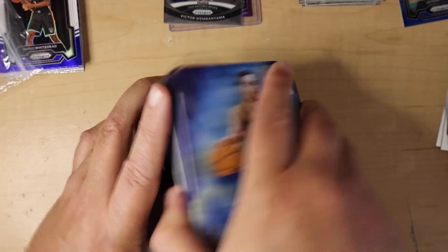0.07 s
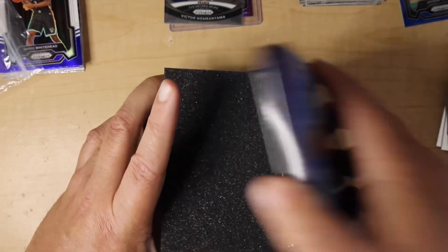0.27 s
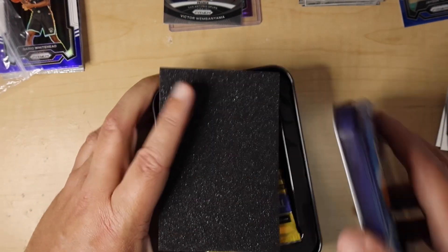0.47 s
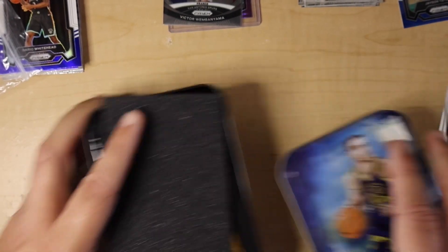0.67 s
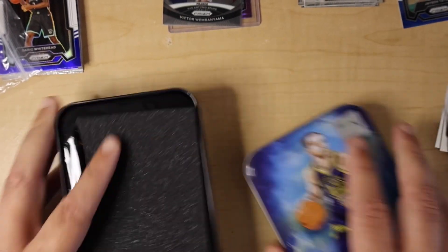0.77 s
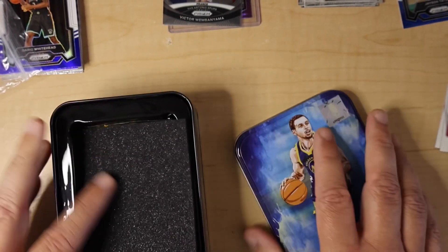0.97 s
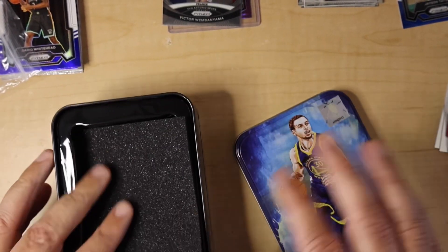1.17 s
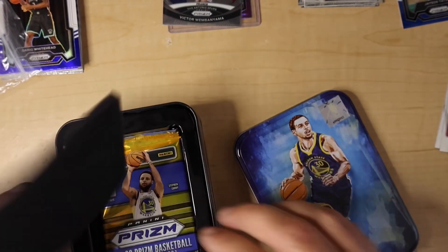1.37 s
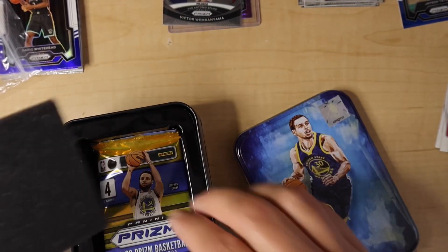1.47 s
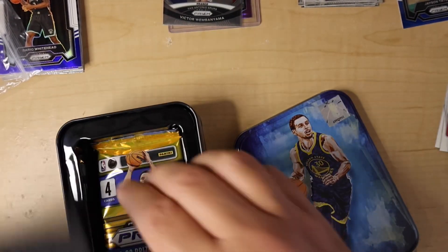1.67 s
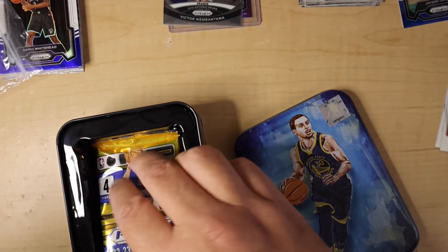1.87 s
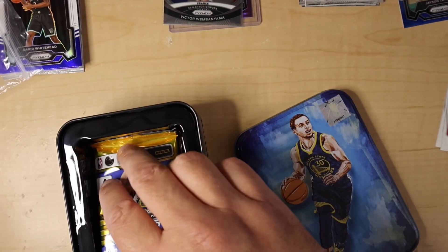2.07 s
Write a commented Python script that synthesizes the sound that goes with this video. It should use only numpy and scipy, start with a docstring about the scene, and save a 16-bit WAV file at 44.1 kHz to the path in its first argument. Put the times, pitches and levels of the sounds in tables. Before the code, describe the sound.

A thin metal tin lid creaks and pops free, brushes away, the tin scrapes along a wooden table, the lid clacks down, then foam rubs and a foil packet crackles; close microphone, small room.

```python
"""In a small room with a wooden table, a thin metal lid is pried off a tin: it creaks, scrapes and pops free.
The tin slides over the table, the lid lands with a clack, a foam pad is rubbed out and a foil packet crackles.
Blows are fading tones plus short noise bursts; rubbing and rustling are shaped noise; sliding is ringing noise.
A room echo, faint room air and a hum are added. The loudest peaks clip, and a limiter dips the level after them."""
import sys
import numpy as np
from scipy import signal
from scipy.fft import rfft, irfft
from scipy.io import wavfile
from scipy.ndimage import uniform_filter1d, minimum_filter1d

SR = 44100
rng = np.random.default_rng(int(sys.argv[2]) if len(sys.argv) > 2 else 0)


def wrap_up_sound(samples):
    """Save the sound to the file named by the first command line argument, as 16-bit audio."""
    columns = np.atleast_2d(samples).T
    # keep every value between -1 and 1, then stretch to whole-number steps
    tamed = np.clip(columns, -1, 1)
    steps = np.round(tamed * 32767).astype(np.int16)
    wavfile.write(sys.argv[1], SR, steps)


N = 93536
TIME = np.arange(N) / SR  # seconds

# All decibel columns are relative: the functions add further gains.
# t60_s is the time to fade by 60 dB; ring_db is the ring's level relative to its blow.

# Tone of the room air: pitch_hz [Hz], level_db [dB]
AIR_TONE = [(25, -22), (100, 4.5), (250, 3.5), (550, 6), (1200, -8), (3000, -6), (8000, -15.5),
            (16000, -16)]
# Room echo by band: pitch_hz [Hz], level_db [dB], t60_s [s]
ECHO_BANDS = [(60.3, -16, 0.16), (242, -2.5, 0.33), (634, -4, 0.43), (1300, -2.5, 0.42), (2580, -0.5, 0.45),
              (5140, 1, 0.43), (9400, 4, 0.31), (16200, -12.5, 0.38)]
# First reflections from walls and ceiling: delay_s [s], level_db [dB]
WALL_REFLECTIONS = [(.0125, -20.5), (.0235, -18), (0.0296, -15.5), (0.0328, -30.5), (.039, -26),
                    (.053, -30.5)]
# Tone of those reflections: pitch_hz [Hz], level_db [dB]
WALL_TONE = [(60, -24), (500, -1.5), (1500, -1), (5000, 2.5), (10000, -8), (16000, 10)]
# Left-right likeness of the close sounds: pitch_hz [Hz], likeness [-1 to 1]
NEAR_LIKENESS = [(50, 1), (1000, 0.99), (3000, 0.93), (7000, 0.27), (13000, 0.1)]
# Left-right likeness of the echo and room air: pitch_hz [Hz], likeness [-1 to 1]
FAR_LIKENESS = [(50, 0.11), (600, 0.88), (1500, 0.97), (3200, 0.17), (7000, -0.01), (12000, -0.55)]

# Soft knocks of fingers and pad on the tin: start_s [s], level_db [dB], ring_db [dB]
KNOCKS = [(.433, -41, 4.5), (.7595, -28, 4), (.836, -25, -18), (.859, -27, -8), (1.3515, -22.5, -3.5),
          (1.361, -32.5, 7), (1.799, -35, -9), (1.8415, -34.5, -3), (1.846, -30, -3)]
# Clatter of a knock by band: pitch_hz [Hz], level_db [dB], t60_s [s]
KNOCK_CLATTER = [(40, -11, .08), (198, -2.5, 0.085), (516, 0.5, .07), (930, 7, 0.18), (2100, 7, 0.024),
                 (4000, -17.5, 0.064), (16000, -11, 0.034)]

# Pad dragging along the tin wall: time_s [s], level_db [dB]
DRAG_LEVEL = [(1, -73), (1.18, -42), (1.23, -44.5), (1.275, -36), (1.33, -41), (1.42, -45), (1.55, -54),
              (1.7, -56.5), (1.81, -47), (1.89, -51.5), (2, -36), (2.06, -46), (2.1, -45)]
# Tone of the drag: pitch_hz [Hz], level_db [dB]
DRAG_TONE = [(40, -21), (200, -9.5), (520, 8.5), (1100, 5.5), (2200, 4.5), (4000, -27), (16000, -20)]
# Hiss of the foam and rustle of the foil: time_s [s], level_db [dB]
RUSTLE_LEVEL = [(1.05, -85), (1.14, -55), (1.22, -43.5), (1.32, -46), (1.365, -40), (1.41, -56),
                (1.48, -48), (1.56, -43.5), (1.65, -47), (1.71, -59), (1.77, -43.5), (1.81, -50.5),
                (1.85, -42), (1.9, -47), (1.96, -36), (2.03, -36), (2.065, -52), (2.082, -33.5),
                (2.12, -39.5)]
# Tone of the hiss and rustle: pitch_hz [Hz], level_db [dB]
RUSTLE_TONE = [(100, -15), (900, -27), (2000, 1), (4000, -6), (6200, -1), (9000, -5.5), (16000, -5.5)]
# Bursts of two foil snaps, the first followed by weaker reflections off the room:
# start_s [s], level_db [dB], tilt_db [dB per octave above 2 kHz], bass_db [dB below 500 Hz]
FOIL_BURSTS = [(1.9321, -5.5, 1.5, -5), (1.9447, -26, -1, -4), (1.948, -21.5, -10, 0), (1.958, -21.5, 0, 1),
               (2.0208, -4, 4.5, 7), (2.035, -20, 9, 0)]
# Such a burst by band: pitch_hz [Hz], level_db [dB], t60_s [s]
FOIL_BANDS = [(40, -23, 0.066), (304, -20.5, 0.016), (915, -11.5, 0.052), (2200, 3.5, 0.018),
              (4650, -1.5, .011), (8800, -2.5, 0.012), (16000, -8.5, 0.0089)]

# Tin sliding on the table: time_s [s], level_db [dB], pitch_factor [times]
SLIDE_PATH = [(.36, -58, 0.97), (.52, -50, 1.36), (.56, -36.5, 0.92), (.62, -25.5, 1.096),
              (.7, -24.5, 1.09), (.765, -24.5, 0.95), (.81, -31, 0.84), (.86, -34.5, 0.69),
              (.895, -35, 1.4), (.93, -92, 0.44)]
# Resonances of the sliding tin, before the pitch factor: pitch_hz [Hz], width_hz [Hz], level_db [dB]
SLIDE_MODES = [(872, 106, -1.5), (1119, 43, 0.5), (1545, 110, -7.5), (1866, 32, -11), (2476, 30, -16),
               (3320, 33, -19), (5550, 83, -23), (6020, 47, -23.5)]
# Tone of the sliding grit: pitch_hz [Hz], level_db [dB]
SLIDE_TONE = [(40, -43), (300, -17), (700, -1), (1100, 1.5), (2000, -7), (3500, -16), (7000, -20),
              (11000, -21), (16000, -24.5)]

# Lid landing on the table: start_s [s], level_db [dB], ring_db [dB]
CLACKS = [(.924, 9.5, -1.5), (.9325, -4.5, -18)]
# Ringing tones of the loose lid: pitch_hz [Hz], level_db [dB], t60_s [s]
LID_MODES = [(797, -25, .2), (975, -7, .05), (1065, -6, .085), (1653, -17, .15), (1919, -20, .17),
             (2054, -15, .12), (2293, -19, .12), (2444, -18, .15), (3122, -20, .1), (3441, -16, .13),
             (4078, -21, .1), (4765, -21, .1), (7880, -23, .07), (14850, -23, .08)]
# Clatter of the lid by band: pitch_hz [Hz], level_db [dB], t60_s [s]
LID_CLATTER = [(30, -31, 0.053), (120, -10, 0.011), (412, -4, 0.02), (940, 1.5, 0.043), (2020, 6.5, 0.012),
               (3800, -12, 0.11), (7300, -16.5, 0.12), (11900, -25.5, 0.11), (17300, -18, 0.016)]
# Lid scuffing the table as it settles: time_s [s], level_db [dB]
SETTLE_LEVEL = [(.925, -74), (.935, -13), (.948, -12), (.958, -5.5), (.978, -11.5), (.995, -29),
                (1.04, -39), (1.09, -34), (1.16, -46.5), (1.24, -73)]
# Tone of the scuffing: pitch_hz [Hz], level_db [dB]
SETTLE_TONE = [(60, -28), (350, -12), (1000, 5.5), (2300, 1), (3600, -4.5), (6500, -9), (9000, -27),
               (16000, -46)]

# Fingers straining on the rim: time_s [s], level_db [dB]
GRIP_LEVEL = [(0, -33), (.015, -37.5), (.03, -33), (.039, -27.5), (.055, -36.5), (.075, -32.5),
              (.087, -32.5), (.1, -18), (.112, -31), (.14, -76)]
# Tone of the straining fingers: pitch_hz [Hz], level_db [dB]
GRIP_TONE = [(30, -29), (100, -0.5), (200, 1.5), (320, 7.5), (480, 1), (1000, -52), (4000, -80),
             (16000, -68)]
# Rim scraping: time_s [s], level_db [dB]
RIM_LEVEL = [(0, -57), (.033, -50), (.039, -34.5), (.044, -39), (.052, -30.5), (.058, -47), (.08, -46.5),
             (.087, -21), (.103, -24.5), (.11, -74)]
# Tone of the scrape: pitch_hz [Hz], level_db [dB]
RIM_TONE = [(100, -38), (600, 6.5), (1700, 0.5), (3000, -4.5), (5000, -7.5), (8000, -13), (16000, -13)]
# Rim slipping and popping free: start_s [s], level_db [dB], ring_db [dB]
POPS = [(.0865, -31, -25), (.0915, -31, 4.5), (.096, -27, 3), (.1005, -16, -23), (.1046, 2, -0.5),
        (.1095, -2.5, -17.5)]
# Ringing tones of the tin as it opens: pitch_hz [Hz], level_db [dB], t60_s [s]
TIN_MODES = [(103, -34, .35), (160, -40, .6), (381, -21, .12), (587, -6, .18), (798, -7, .09),
             (1000, -12, .08), (1080, -10, .07), (1189, -11, .14), (1399, -17, .12), (1521, -15, .07),
             (1697, -13, .13), (1806, -7, .09), (2485, -14, .07), (3110, -13, .05)]
# Dense, short clatter of the tin by band: pitch_hz [Hz], level_db [dB], t60_s [s]
TIN_CLATTER = [(30, 2, 0.057), (100, -15, .06), (217, -13, 0.033), (460, -4, 0.074), (1050, 6.5, 0.058),
               (2760, -0.5, 0.075), (4600, -16.5, 0.098), (8300, -21.5, 0.046), (16000, -27, 0.036)]
# Lid brushing over the pad as it is lifted away: time_s [s], level_db [dB]
LIFT_LEVEL = [(.11, -80), (.16, -24.5), (.2, -24.5), (.25, -32.5), (.31, -47.5), (.42, -49), (.5, -52),
              (.56, -76)]
# Tone of the brushing: pitch_hz [Hz], level_db [dB]
LIFT_TONE = [(60, -20), (160, -21), (350, -13), (800, 1), (1200, 8.5), (1900, 0.5), (2800, -7.5),
             (4500, -18), (9000, -35), (16000, -64)]


def amp(db):
    """Turns decibels into a gain."""
    return 10 ** (np.asarray(db) / 20)


def unit(x):
    """Scales a sound to an average strength (rms) of 1."""
    return x / np.sqrt(np.mean(x ** 2) + 1e-20)


def read(table, hz, axis=1):
    """Reads one column of a pitch table, blending between rows on a log-frequency scale."""
    rows = np.array(table, float)
    return np.interp(np.log(hz + 1), np.log(rows[:, 0] + 1), rows[:, axis])


def curve(table, axis=1):
    """Reads one column of a time table at every sample."""
    rows = np.array(table, float)
    return np.interp(TIME, rows[:, 0], rows[:, axis])


def add(mix, start_s, sound):
    """Mixes a sound in at a time, cutting off what runs past the end."""
    part = mix[:, round(start_s * SR):][:, :sound.shape[1]]
    part += sound[:, :part.shape[1]]


def colour(pair, tone, likeness):
    """Gives two unrelated signals a tone and a left-right likeness by mixing a middle and a side part."""
    size = pair.shape[1]
    hz = np.fft.rfftfreq(size, 1 / SR)
    same = np.clip(read(likeness, hz), -1, 1)
    mid, side = rfft(pair) * amp(read(tone, hz)) * np.sqrt([1 + same, 1 - same])
    return unit(irfft([mid + side, mid - side], size))


def dying(table, likeness, size, tilt_db=0, bass_db=0, crack=0):
    """Makes a noise burst, with an optional first crack, in which each band dies at its own speed."""
    t = np.arange(size) / SR
    log_hz = np.log(np.fft.rfftfreq(size, 1 / SR) + 1)
    tone = []
    for hz, db, _ in table:
        treble_db = tilt_db * max(np.log2(hz / 2000), 0)
        tone.append((hz, db + treble_db + bass_db * (hz < 500)))
    taps = rng.choice([-1., 1.], (2, size))
    taps[0, 8] += crack  # one stronger tap in the middle of the stereo image
    spectrum = rfft(colour(taps, tone, likeness))
    centres = np.log([row[0] for row in table])
    burst = 0
    for band, (_, _, t60_s) in zip(np.eye(len(table)), table):
        band_sound = irfft(spectrum * np.interp(log_hz, centres, band), size)
        burst = burst + band_sound * amp(-60 * t / t60_s)
    return burst


def grains(catches_per_s=2500, spread_db=3.5):
    """Makes friction noise: tiny catches of uneven size over a smooth hiss."""
    happens = rng.random((2, N)) < catches_per_s / SR
    sizes = amp(spread_db * np.minimum(rng.exponential(1, (2, N)), 4))
    catches = happens * sizes * rng.choice([-1, 1], (2, N))
    return unit(unit(catches) + 1.17 * rng.standard_normal((2, N)))


def judder():
    """Makes quick random changes of pressure from smoothed noise."""
    return unit(uniform_filter1d(rng.standard_normal(N), size=260))


def rub(levels, tone, judder_db):
    """Shapes friction grains by a stroke whose pressure judders."""
    return colour(grains(), tone, NEAR_LIKENESS) * amp(curve(levels) + judder_db * judder())


def blows(events, modes, clatter, clatter_db, low_hz):
    """Each blow rings the sheet metal's tones over a short clatter, with its lowest bass cut away."""
    t = np.arange(SR // 2) / SR
    ring = np.zeros((2, t.size))
    for i, (hz, db, t60_s) in enumerate(modes):
        # Opposite phase shifts left and right give each tone its width.
        sign = (-1) ** i
        shift = sign * np.arccos(np.clip(read(NEAR_LIKENESS, hz), -1, 1)) / 2
        wave = np.sin(2 * np.pi * hz * t + np.array([[shift], [-shift]]))
        ring += sign * amp(db - 60 * t / t60_s) * wave
    out = np.zeros((2, N))
    for start_s, level_db, ring_db in events:
        add(out, start_s, amp(level_db + ring_db) * ring)
        burst = dying(clatter, NEAR_LIKENESS, size=8192, crack=3.5)
        add(out, start_s, amp(level_db + clatter_db) * burst)
    return signal.sosfilt(signal.butter(2, low_hz, "high", fs=SR, output="sos"), out)


def background(air_db=-50, hum_hz=57.4, hum_db=-56.5):
    """Room air is shaped noise, and the low hum is one steady sine tone."""
    air = colour(rng.standard_normal((2, N)), AIR_TONE, FAR_LIKENESS)
    hum = unit(np.sin(2 * np.pi * hum_hz * TIME))
    return amp(air_db) * air + amp(hum_db) * hum


def room(near, tail_db=-13, build_s=0.0062):
    """A small room answers with a few wall reflections and a diffuse echo, fed by the left channel."""
    tail = dying(ECHO_BANDS, FAR_LIKENESS, size=32768)
    tail = tail * np.minimum(TIME[:tail.shape[1]] / build_s, 1) ** 2
    echo = amp(tail_db) * tail / np.linalg.norm(tail[0])
    size = SR // 100
    for delay_s, level_db in WALL_REFLECTIONS:
        slap = np.zeros((2, 2048))
        burst = rng.standard_normal((2, size)) * np.exp(-TIME[:size] / 0.0013)
        add(slap, .001, burst)  # 1 ms of lead-in, taken off the delay below
        slap = colour(slap, WALL_TONE, FAR_LIKENESS)
        add(echo, delay_s - .001, amp(level_db) * slap / np.linalg.norm(slap[0]))
    return signal.fftconvolve(near[:1], echo, axes=1)[:, :N]


def knocking():
    """Fingers and pad knock softly on the tin, ringing its metal."""
    return blows(KNOCKS, TIN_MODES, KNOCK_CLATTER, clatter_db=-1, low_hz=90)


def dragging_pad():
    """The foam pad rubs along the tin wall with a juddering pressure."""
    return rub(DRAG_LEVEL, DRAG_TONE, judder_db=1.0)


def rustling_foil():
    """Foam hiss and foil rustle are friction noise; two foil snaps and room reflections are short bursts."""
    out = rub(RUSTLE_LEVEL, RUSTLE_TONE, judder_db=0.86)
    for start_s, level_db, tilt_db, bass_db in FOIL_BURSTS:
        burst = dying(FOIL_BANDS, NEAR_LIKENESS, size=4096, tilt_db=tilt_db, bass_db=bass_db, crack=4.27)
        add(out, start_s, amp(level_db) * burst)
    return out


def sliding(grit_db=-4, ring_db=-3, flutter_db=1.5):
    """Table grain excites the tin's bottom, whose resonances shift in pitch together along the slide."""
    drive = grains()[0]
    pitch_factor = curve(SLIDE_PATH, axis=2)
    ring = 0
    for hz, width_hz, db in SLIDE_MODES:
        # Shift the moving pitch down to zero, smooth around it, and shift it back up.
        turn = np.exp(2j * np.pi * np.cumsum(hz * pitch_factor) / SR)
        r = np.exp(-2 * np.pi * width_hz / SR)
        smooth = signal.lfilter([1], [1, -2 * r, r * r], drive / turn)
        ring = ring + amp(db) * unit((turn * smooth).real)
    ring_gain = amp(ring_db + curve(SLIDE_PATH) + flutter_db * judder())
    grit = rub(SLIDE_PATH, SLIDE_TONE, judder_db=0.0)
    return ring_gain * unit(ring) + amp(grit_db) * grit


def landing():
    """The lid clacks onto the table, ringing its metal, and scuffs to rest as friction noise."""
    clack = blows(CLACKS, LID_MODES, LID_CLATTER, clatter_db=-2.5, low_hz=222)
    return clack + rub(SETTLE_LEVEL, SETTLE_TONE, judder_db=1)


def prying():
    """Fingers strain and the rim scrapes as friction; the lid pops free, ringing the tin, and brushes away."""
    strain = rub(GRIP_LEVEL, GRIP_TONE, judder_db=0.5)
    scrape = rub(RIM_LEVEL, RIM_TONE, judder_db=-0.5)
    pop = blows(POPS, TIN_MODES, TIN_CLATTER, clatter_db=-2.5, low_hz=60)
    brush = rub(LIFT_LEVEL, LIFT_TONE, judder_db=-0.5)
    return strain + scrape + pop + brush


def scene():
    """Adds up all the handling, its echo and the background."""
    near = knocking() + dragging_pad() + rustling_foil() + sliding() + landing() + prying()
    return background() + room(near) + near


def record(dry, limit_db=0.5, attack_s=0.0023, hold_s=0.042, recover_db_per_s=110,
           low_cut_hz=44, high_cut_hz=16200):
    """A limiter ducks after loud peaks, holds and recovers; what gets through clips; then bass and treble are cut."""
    peak_db = 20 * np.log10(abs(dry).max(0) + 1e-9)
    over_db = np.maximum(peak_db - limit_db, 0)
    half = max(int(hold_s * SR / 2), 1)
    # Hold the largest recent overshoot, then let it fall at a steady rate.
    held_db = -minimum_filter1d(-over_db, 2 * half + 1, origin=half, mode="constant")
    fall_db = TIME * recover_db_per_s
    falling_db = np.maximum.accumulate(held_db + fall_db) - fall_db
    r = np.exp(-1 / (attack_s * SR))
    duck_db = signal.lfilter([1 - r], [1, -r], falling_db)
    loud = np.clip(dry * amp(-duck_db), -1, 1)
    loud = signal.sosfilt(signal.butter(2, low_cut_hz, "high", fs=SR, output="sos"), loud)
    treble_cut = signal.firwin(255, high_cut_hz, window=("kaiser", 8), fs=SR)
    return signal.oaconvolve(loud, treble_cut[None], "same")


dry = scene()
out = record(dry)
wrap_up_sound(out)
```